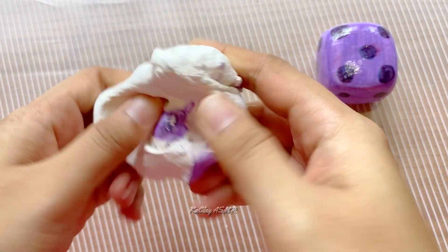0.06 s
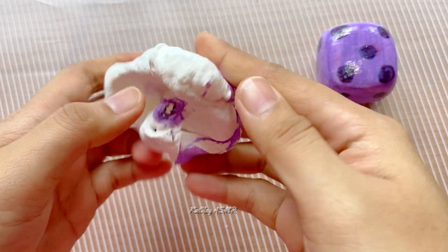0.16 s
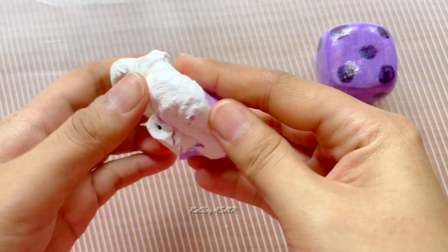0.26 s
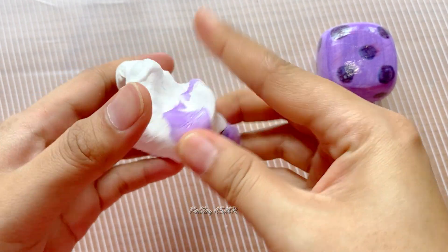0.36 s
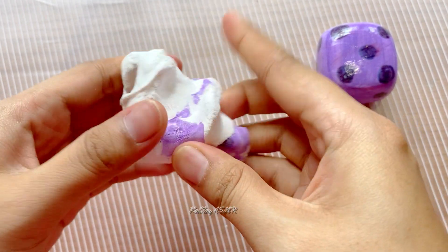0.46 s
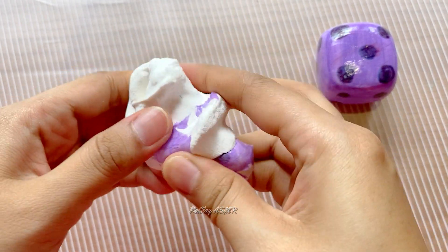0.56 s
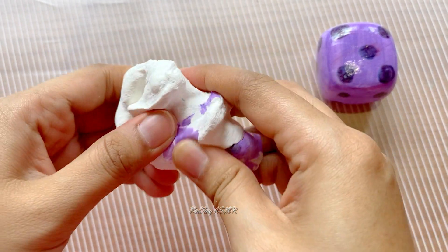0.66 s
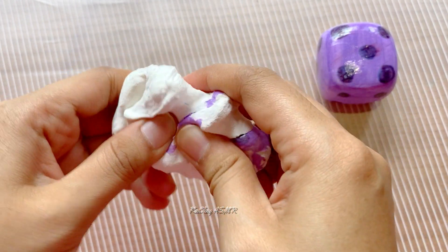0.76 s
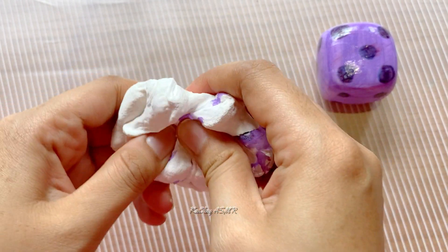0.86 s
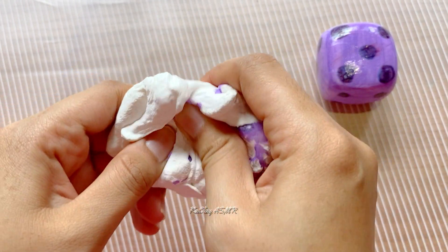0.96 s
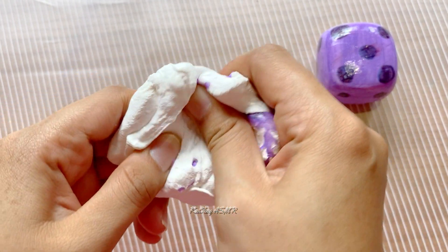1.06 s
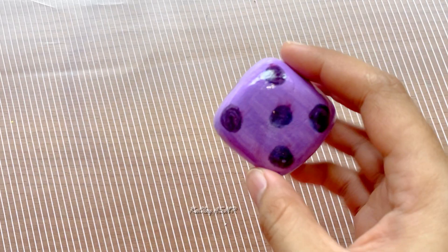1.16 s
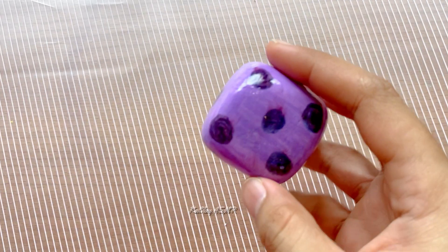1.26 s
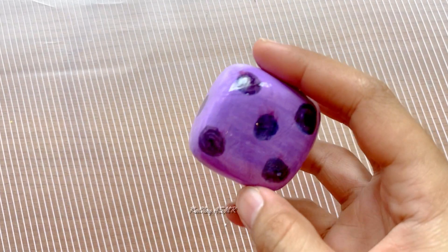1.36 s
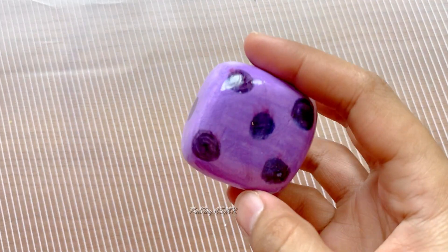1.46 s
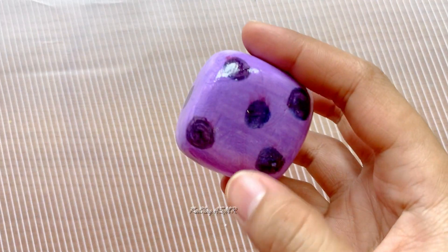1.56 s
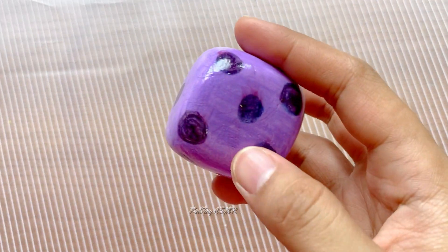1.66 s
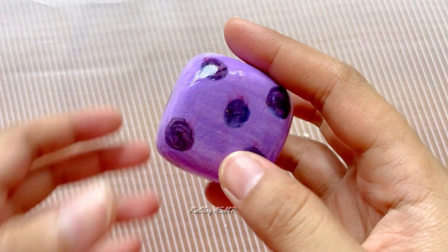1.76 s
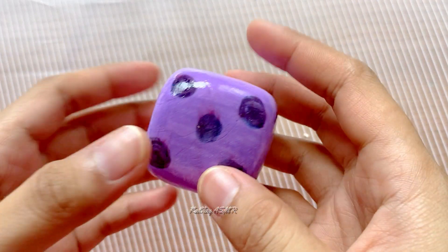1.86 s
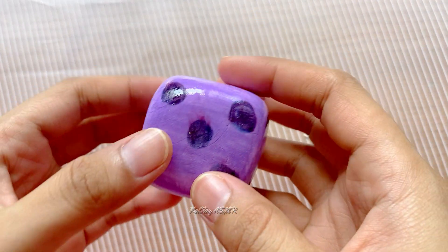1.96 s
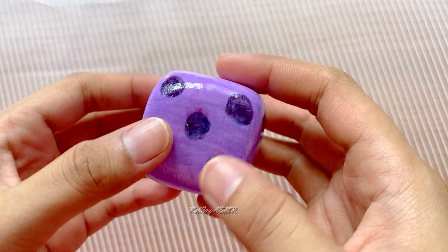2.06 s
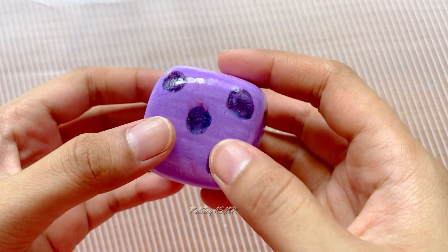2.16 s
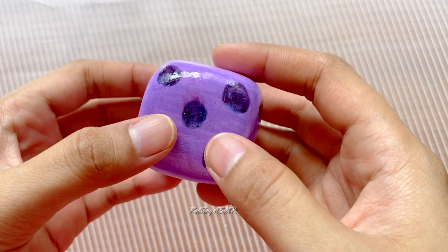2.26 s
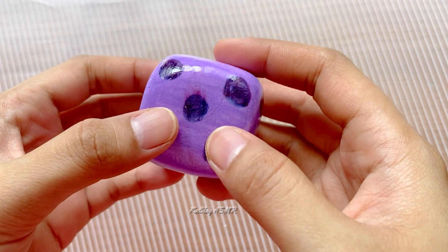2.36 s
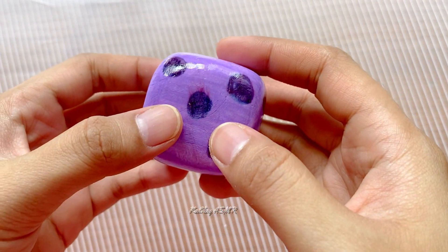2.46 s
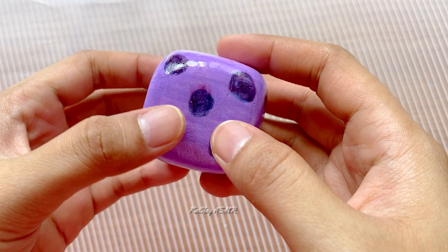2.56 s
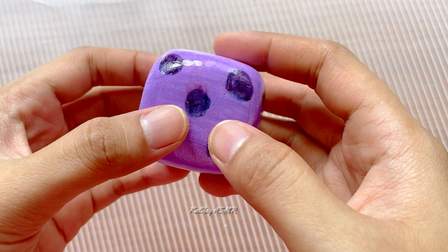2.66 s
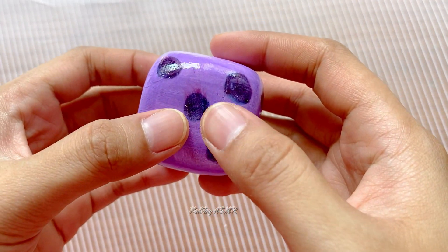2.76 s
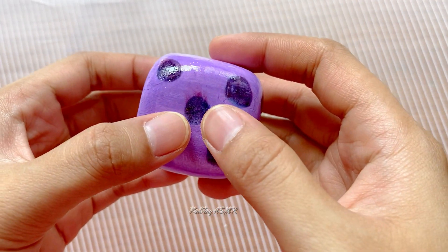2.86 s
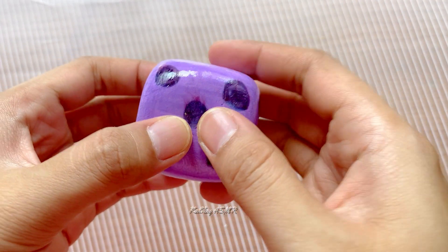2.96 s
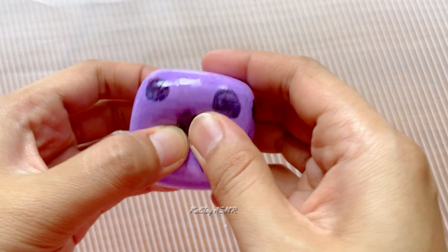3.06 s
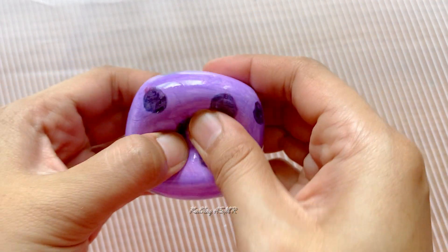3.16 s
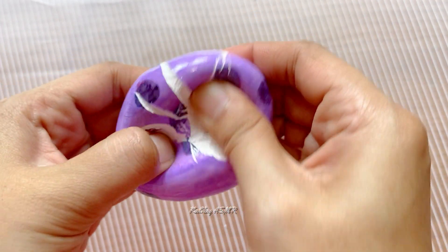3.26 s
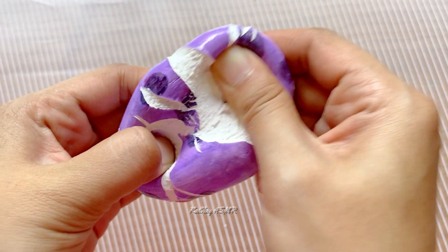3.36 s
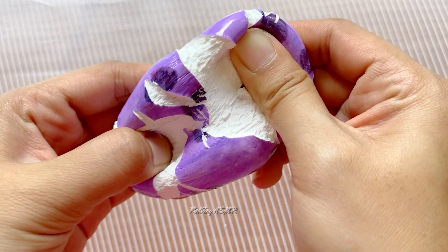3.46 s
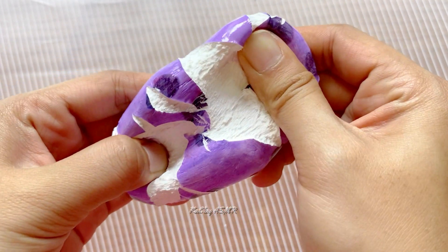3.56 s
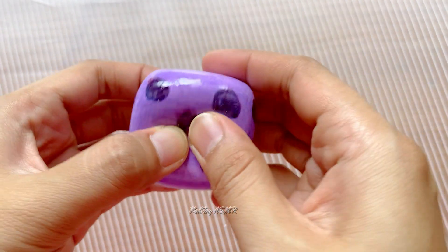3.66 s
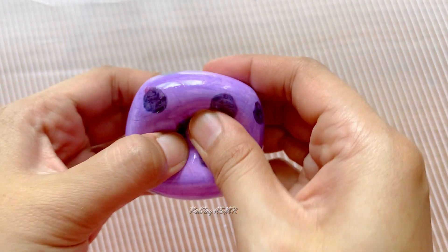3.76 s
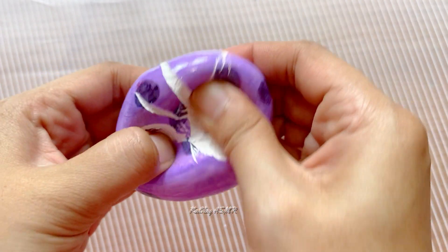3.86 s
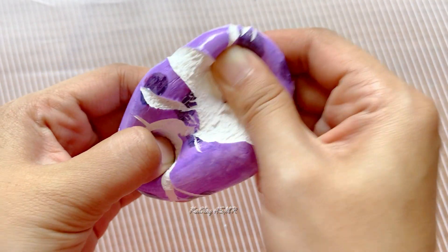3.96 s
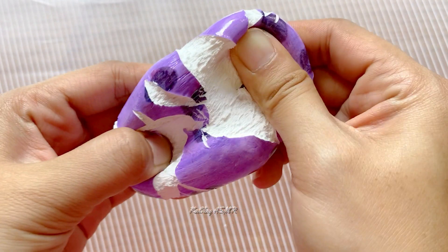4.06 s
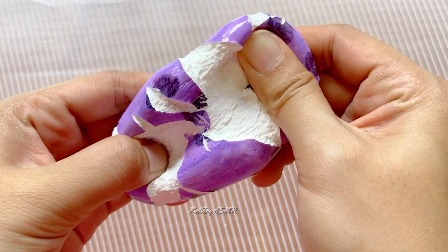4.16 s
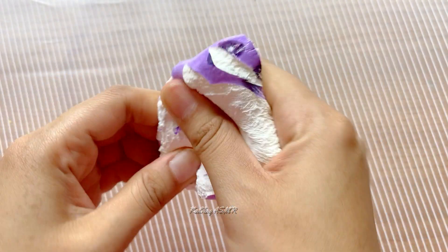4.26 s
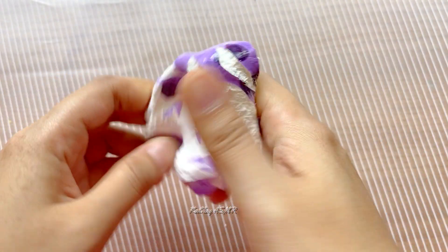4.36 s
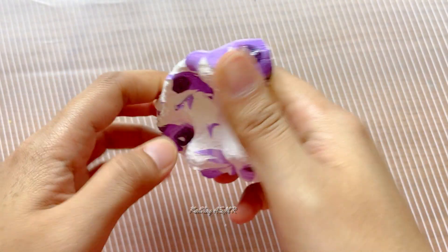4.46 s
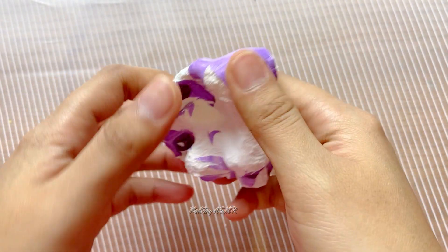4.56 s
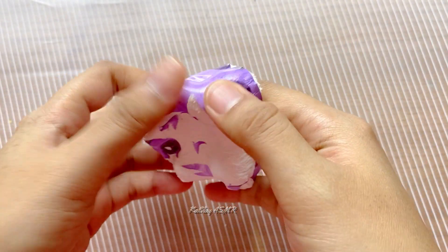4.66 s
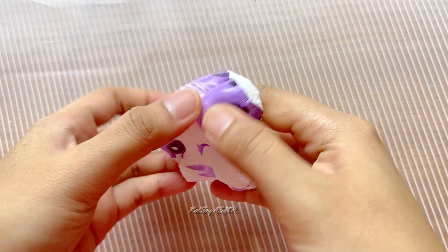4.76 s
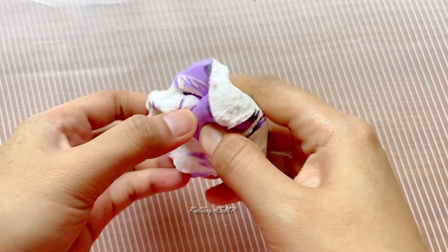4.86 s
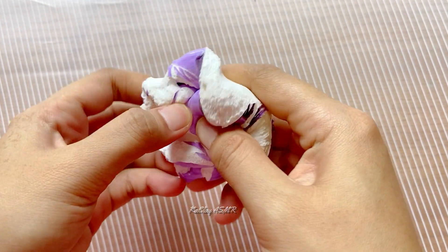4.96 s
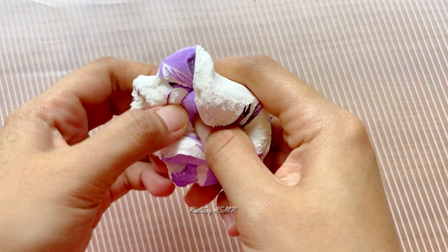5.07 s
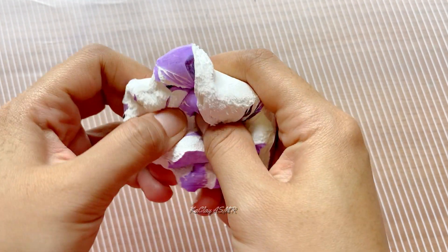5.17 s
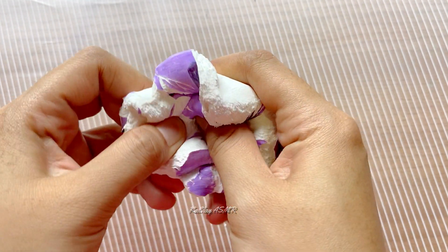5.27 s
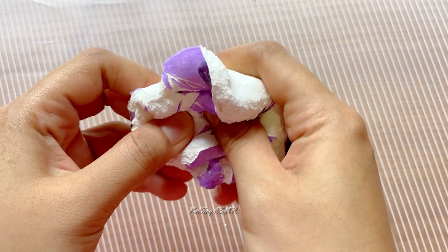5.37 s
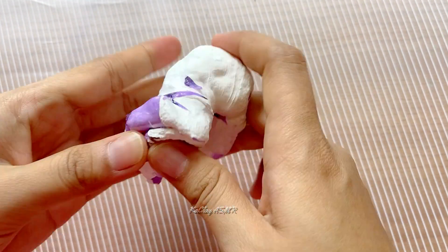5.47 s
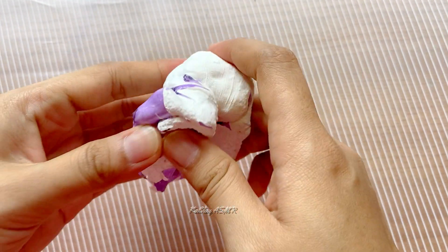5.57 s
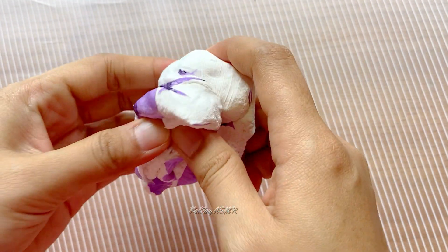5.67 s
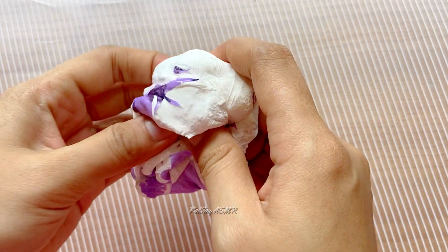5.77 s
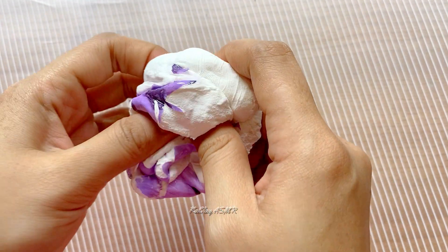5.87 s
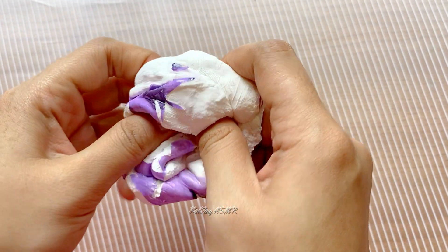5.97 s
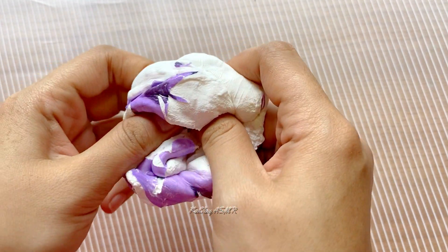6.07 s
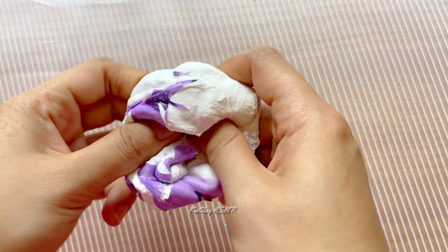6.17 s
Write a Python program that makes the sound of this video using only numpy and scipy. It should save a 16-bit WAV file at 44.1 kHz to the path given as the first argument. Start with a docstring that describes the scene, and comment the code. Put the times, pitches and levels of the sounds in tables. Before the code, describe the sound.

Fingers crush brittle-shelled soft clay up close: crackling crumble, an abrupt hush, then a sharp loud crunch heard twice and more crisp crackling bursts.

```python
"""In a quiet room, close by, fingers crush lumps of soft clay with a brittle dried shell.
Sharp cracks are noise bursts that ring in three bands; a dense crumble is chance grains through resonances.
Low thumps come from the soft core, and a short diffuse tail from the room; one squeeze is heard twice.
Below lie hiss, a low rumble, a hum and a thin whine, all shaped noise; the loudest cracks overload the input."""
import sys
import numpy as np
from scipy import signal
from scipy.fft import rfft, irfft
from scipy.io import wavfile

SR = 44100
rng = np.random.default_rng(int(sys.argv[2]) if len(sys.argv) > 2 else 0)


def field_ratio(decibels):
    """Amplitude ratio for a level in dB (20 dB per decade); scalars and array-likes work."""
    return 10 ** (np.asarray(decibels, dtype=float) / 20)


def int16_out(signal):
    """Quantize to a 16-bit WAV file."""
    q = np.round(np.clip(np.atleast_2d(signal).T, -1, 1) * 32767)
    wavfile.write(sys.argv[1], SR, q.astype(np.int16))


N = 274302
TIME = np.arange(N) / SR


def unit(x):
    """Normalisation: scales a signal to rms 1."""
    return x / np.sqrt(np.mean(x ** 2) + 1e-20)


def coloured(x, spectrum):
    """Linear filtering: weights the spectrum of x by (hz, gain_db) points, joined on a log frequency axis."""
    hz, db = np.transpose(spectrum)
    bins_hz = np.maximum(np.arange(len(x) // 2 + 1) * SR / len(x), 1)
    gain = field_ratio(np.interp(np.log(bins_hz), np.log(hz), db))
    return irfft(rfft(x) * gain, len(x))


def band(low_hz, high_hz):
    """Band limiting: sections of a Butterworth band-pass filter."""
    return signal.butter(3, [low_hz, min(high_hz, .45 * SR)], "band", fs=SR, output="sos")


def resonate(x, hz, width_hz):
    """Damped resonance: a pole pair whose radius sets the bandwidth, with gain 1 on top."""
    r = np.exp(-np.pi * width_hz / SR)
    zeros = [(1 - r * r) / 2, 0, (r * r - 1) / 2]
    poles = [1, -2 * r * np.cos(2 * np.pi * hz / SR), r * r]
    return signal.lfilter(zeros, poles, x)


def drift(rate_hz):
    """Slow random modulation: white noise through a two-pole low-pass, with spread 1."""
    r = np.exp(-2 * np.pi * rate_hz / SR)
    settled = signal.lfilter([1], [1, -2 * r, r * r], rng.standard_normal(N + SR))[SR:]
    return unit(settled)


def narrow_noise(hz, width_hz):
    """Narrow-band noise: two equal resonances in cascade give a wavering tone of rms 1."""
    once = resonate(rng.standard_normal(N), hz, width_hz)
    return unit(resonate(once, hz, width_hz))


def air_hiss():
    """Broadband noise: steady room air and hiss with a falling spectrum."""
    # spectrum of the air: hz, relative_db_per_hz
    air_spectrum = [(20, 4.5), (60, -0.5), (300, -7), (700, -9), (1200, -12), (10000, -17.5), (16000, -15)]
    return field_ratio(-61.5) * unit(coloured(rng.standard_normal(N), air_spectrum))


def low_rumble():
    """Amplitude modulation: narrow noise at 66 Hz swells and sinks in level."""
    # level of the rumble: time_s, level_db
    rumble_level = [(.55, -70.5), (.75, -53.5), (1.0, -66), (1.2, -51.5), (1.5, -62), (1.9, -71),
                    (2.198, -76.5), (6.22, -72.5)]
    s, db = np.transpose(rumble_level)
    return field_ratio(np.interp(TIME, s, db)) * narrow_noise(66.0, 23.0)


def motor_hum():
    """Harmonic series: a distant motor's hum, wavering lines on multiples of one pitch."""
    pitch_hz, width_hz = 58.54, 9.7
    # lines of the hum: multiple, level_db
    hum_lines = [(1, -63.5), (2, -75), (3, -70), (4, -71.5), (5, -79), (6, -78.5), (7, -81.5), (8, -78),
                 (9, -86)]
    return sum(field_ratio(db) * narrow_noise(k * pitch_hz, width_hz) for k, db in hum_lines)


def puffs():
    """Enveloped noise: bands of noise swell and die as faint passing noises and short rubs of the clay."""
    # puffs and rubs, rise and fall to 1/e of the peak: peak_s, rise_s, fall_s, centre_hz, width_hz, level_db
    puff_rows = [(.408, 0.0054, .01, 3240, 900, -48.5), (0.559, 0.0055, 0.0072, 3300, 600, -50),
                 (.578, 0.0049, 0.009, 3260, 500, -44.5), (1.44, 0.035, 0.047, 11770, 7120, -55.5),
                 (1.679, 0.021, 0.056, 1007, 150, -54.5), (1.75, 0.056, 0.077, 1038, 296, -61),
                 (4.664, .004, 0.0034, 3100, 900, -47), (4.681, .004, .004, 3050, 900, -41.5),
                 (5.661, 0.005, 0.0093, 3500, 1150, -32), (5.661, 0.0086, .012, 1940, 600, -41),
                 (5.69, 0.013, 0.023, 3600, 1000, -42)]
    out = np.zeros(N)
    for at, rise, fall, hz, width_hz, db in puff_rows:
        decay = np.where(TIME < at, ((at - TIME) / rise) ** 2, np.abs(TIME - at) / fall)
        out += field_ratio(db) * np.exp(-decay) * narrow_noise(hz, width_hz)
    return out


def background():
    """Superposition: the hiss, rumble, hum, puffs and a thin whine at 10686 Hz add up."""
    whine = field_ratio(-85) * narrow_noise(10686, 30.0)
    return air_hiss() + low_rumble() + motor_hum() + puffs() + whine


def room(x, dull=0.098):
    """Reverberation: convolution with exponentially dying noise gives a short diffuse tail."""
    t60_s, tail_db = .09, -17
    t = np.arange(round(.25 * SR)) / SR
    tail = rng.standard_normal(len(t)) * field_ratio(-60 * t / t60_s) * (t > .002)
    tail = signal.lfilter([1], [1, -dull], tail)
    tail = tail / np.sqrt(np.sum(tail ** 2))
    return field_ratio(tail_db) * signal.fftconvolve(x, tail)[:N]


def pressure():
    """Power summation: overlapping finger presses set the crumble's level (dB) and brightness (dB)."""
    shape = 1.165  # 1 = pointed swell, 2 = rounded
    # presses of the fingers, rise and fall span 20 dB: peak_s, peak_db, rise_s, fall_s, brightness_db
    presses = [(0.086, -29.5, 0.036, 0.11, -0.5), (0.146, -25, 0.082, 0.057, 1.5),
               (0.189, -39, 0.049, .03, 1), (.24, -47.5, .05, 0.073, -5.5), (.42, -52.5, 0.073, 0.033, -10),
               (.575, -57.5, 0.066, 0.048, 2.5), (.785, -32, 0.065, 0.026, -9.5), (.84, -44.5, .05, .06, 5),
               (.905, -36, 0.068, 0.077, 3.5), (.995, -33.5, 0.043, .08, 0.5),
               (1.07, -36.5, 0.22, 0.14, 4.5), (3.209, -50, 0.03, 0.051, 16.5),
               (3.268, -27.5, .006, .04, -2), (3.286, -15, .01, 0.13, 0), (3.345, -19.5, .05, .14, -5.5),
               (3.48, -40, 0.096, 0.12, -5.5), (4.28, -48.5, 0.14, 0.13, 16), (4.376, -27.5, 0.1, 0.12, 6),
               (4.48, -36, .1, 0.089, -3), (4.55, -41, .04, 0.018, 0.5), (4.679, -57, 0.29, 0.047, -2),
               (4.85, -57, 0.27, 0.22, 1.5), (5.031, -46, 0.078, 0.2, 1.5),
               (5.059, -37.5, 0.023, .04, -5.5), (5.16, -25.5, 0.024, .12, -4), (5.26, -38, 0.052, .1, 3),
               (5.391, -43, 0.032, .06, 13.5), (5.486, -28.5, 0.076, 0.016, 0.5),
               (5.57, -51.5, 0.049, 0.071, 0), (5.67, -43.5, 0.091, 0.065, -0.5),
               (5.77, -40, 0.096, 0.14, 6), (5.855, -27, 0.097, 0.14, -4), (6.035, -29.5, 0.14, 0.13, -1.5),
               (6.2, -46.5, 0.156, .1, 0)]
    s, db, rise, fall, bright_db = np.transpose(presses)[:, :, None]
    t = TIME[::32]
    away = np.where(t < s, (s - t) / rise, (t - s) / fall)
    power = field_ratio(np.maximum(db - 20 * away ** shape, -150)) ** 2
    total = power.sum(axis=0)
    level_db = 10 * np.log10(total)
    mean_bright_db = (power * bright_db).sum(axis=0) / total
    return np.interp(TIME, t, level_db), np.interp(TIME, t, mean_bright_db)


def crumble(level_db, bright_db, cycles=2.3, knee_hz=5000.0):
    """Shot noise: dense small fractures of uneven size come in clumps and each briefly rings a resonance."""
    per_s, spread_db, clump_db = 7000, 3.9, 2.5
    # relative spectrum of the shards: hz, relative_db_per_hz
    shard_spectrum = [(250, -36), (700, -14.5), (1500, -3.5), (2250, -11.5), (3240, -4), (5600, -3),
                      (10200, -1.5), (13500, 1), (16000, -12.5)]
    sizes = field_ratio(spread_db * np.minimum(rng.exponential(1, N), 4)) * rng.choice([-1, 1], N)
    grains = sizes * (rng.random(N) < per_s / SR)
    dealt = rng.integers(0, 8, N)  # which of the eight pitches each grain rings
    rings = np.zeros(N)
    for k, hz in enumerate(np.geomspace(600, 14000, 8)):
        own_grains = grains * (dealt == k) + 1e-18
        rings += unit(resonate(own_grains, hz, hz / cycles)) * np.sqrt(hz)
    rings = unit(coloured(rings, shard_spectrum))
    # brightness raises the part above the knee and lowers the part below it
    dull = signal.sosfilt(signal.butter(2, knee_hz, fs=SR, output="sos"), rings)
    tilt = field_ratio(bright_db / 2)
    tilted = dull / tilt + (rings - dull) * tilt
    return field_ratio(level_db + clump_db * drift(40)) * tilted


def chips(level_db):
    """Random point process: small cracks at chance moments, sized by the pressure, each of its own colour."""
    per_s, base_db, size_spread_db, colour_spread_db = 110, -11, 4, 7
    draw = rng.random((round(per_s * N / SR), 2))
    pressed_db = level_db[(draw[:, 0] * N).astype(int)]
    size_db = pressed_db + base_db - size_spread_db * np.log(np.maximum(draw[:, 1], .02))
    colour_db = colour_spread_db * np.clip(rng.standard_normal((len(draw), 3)), -3, .5)
    return np.column_stack([draw[:, 0] * N / SR, size_db[:, None] + colour_db])


def start_level(x):
    """Onset normalisation: scales x to rms 1 over its first 2 ms."""
    return x / np.sqrt(np.mean(x[:SR // 500] ** 2))


def cracks(rows, thumps, thump_hz=500.0, thump_damping=26.0, knock_db=5.0):
    """Brittle fracture: a sharp front and a ragged, dying burst of noise excite brief shard resonances."""
    ragged_db, front, ring_db, cycles = 4, 4, 2, 5
    # decay at a level of -20 dB, its growth (octaves per 10 dB) and its chance spread (octaves)
    usual_t60_s, loud_longer, t60_spread = 0.0067, 0.096, 0.43
    # each crack nudges the core: thump level at a body level of -30 dB, and its slope (dB per dB)
    nudge_db, nudge_follows = -57, 0.41
    # where the shards ring: low_hz, high_hz, ring_hz, ring_spread_octaves
    shell_bands = [(1800, 4000, 2300, .15), (4000, 8500, 5000, .3), (8500, 16000, 12500, .2)]
    size = 1024
    out = np.zeros(N + size)
    t = np.arange(size) / SR
    filters = [band(low, high) for low, high, hz, octaves in shell_bands]
    count = len(rows) + len(thumps)
    breaks = rng.standard_normal((count, size))
    ragged = rng.standard_normal((count, size // 16))
    chance = rng.standard_normal((count, 4))
    # the soft core gives way under the shell: one low push, and the burst heard dully through the clay
    push = np.sin(2 * np.pi * thump_hz * t) * np.exp(-t * thump_hz * thump_damping)
    push = start_level(signal.sosfilt(band(60, 1400), push))
    core = band(750, 1800)
    for k, (s, *levels_db) in enumerate([*rows, *thumps]):
        if max(levels_db) < -75:
            continue
        octaves_longer = loud_longer * (max(levels_db) + 20) / 10 + t60_spread * chance[k, 3]
        t60 = max(usual_t60_s * 2 ** octaves_longer, .002)
        burst = breaks[k] * field_ratio(-60 * t / t60 + ragged_db * np.repeat(ragged[k], 16))
        burst[0] = front * np.sign(burst[0])
        is_shell = k < len(rows)
        thump_db = nudge_db + nudge_follows * (levels_db[0] + 30) if is_shell else levels_db[0]
        knock = field_ratio(knock_db) * start_level(signal.sosfilt(core, burst))
        crack = field_ratio(thump_db) * (push + knock)
        shell_levels_db = levels_db if is_shell else []
        for sos, (low, high, hz, octaves), db, p in zip(filters, shell_bands, shell_levels_db, chance[k]):
            hz = np.clip(hz * 2 ** (octaves * p), low, high)
            ring = field_ratio(ring_db) * np.sqrt(cycles) * resonate(burst, hz, hz / cycles)
            crack = crack + field_ratio(db) * start_level(signal.sosfilt(sos, burst + ring))
        at = round(s * SR)
        out[at:at + size] += crack
    return out[:N]


def scene():
    """Superposition: clay and its room tail, cut off after the first lump, over the background."""
    cut_s, cut_fade_s = 1.136, .005
    replay_from_s, replay_at_s, replay_s = 3.05, 3.64946, .55
    # clear cracks of the shell, rms over the first 2 ms in three bands (1.8-4, 4-8.5, 8.5-16 kHz):
    # start_s, body_db, edge_db, snap_db
    clear_cracks = [(0.0332, -41, -58, -36.5), (0.0506, -34.5, -56, -24), (0.0835, -27.5, -32.5, -19.5),
                    (0.1066, -23.5, -26.5, -26), (0.1239, -27, -29, -26), (0.1444, -29, -16.5, -20.5),
                    (0.1496, -16.5, -20, -21.5), (0.1937, -25.5, -25.5, -33.5), (0.2136, -45, -49, -44),
                    (0.2588, -49, -53, -51.5), (0.3229, -65, -61, -51), (0.3404, -70, -58, -47.5),
                    (0.424, -45.5, -38, -38.5), (0.4414, -44, -27, -27.5), (0.5756, -49, -49, -50),
                    (0.5912, -60, -55, -47), (0.7107, -35, -34.5, -35.5), (0.7282, -26, -28, -25),
                    (0.7371, -33, -35, -37.5), (0.7475, -47, -37, -36), (0.7556, -47, -39, -33.5),
                    (0.7649, -27.5, -30, -17), (0.7729, -37, -20, -19), (0.7811, -45, -34, -22),
                    (0.7868, -41, -22.5, -16.5), (0.7952, -26, -20.5, -17.5), (0.7989, -37, -26, -24.5),
                    (0.8286, -51, -36.5, -28), (0.8461, -45, -35.5, -29.5), (0.8693, -41.5, -25.5, -28),
                    (0.8873, -31.5, -18, -19), (0.8891, -22.5, -19, -23), (0.8996, -28, -20, -18.5),
                    (0.9096, -23.5, -17.5, -20), (0.9302, -36, -28, -32), (0.9364, -43, -22.5, -28),
                    (0.9481, -34.5, -28.5, -28), (0.9726, -32, -27, -31.5), (0.99, -27, -20.5, -14.5),
                    (1.0003, -27.5, -21, -19.5), (1.0303, -27.5, -17, -21.5), (1.0389, -35, -27, -23),
                    (1.0605, -32, -27, -30.5), (1.0651, -31, -20.5, -21), (1.07, -41, -19, -25),
                    (1.0875, -22.5, -18.5, -22), (1.1039, -33, -18.5, -23.5), (1.1269, -16.5, -16, -16.5),
                    (3.0161, -52, -52, -41.5), (3.177, -46.5, -40, -38), (3.1868, -46.5, -32, -33),
                    (3.1918, -44, -33.5, -32.5), (3.1944, -41.5, -30, -30.5), (3.2042, -39, -20.5, -23),
                    (3.2092, -30, -19, -14.5), (3.2634, -17.5, -12.5, -7.5), (3.2648, -7, -14, -9.5),
                    (3.2806, -10.5, -5, -11.5), (3.2822, -9.5, -15, -3), (3.2946, -18.5, -14.5, -6),
                    (3.3038, -17, -18.5, -20), (3.3134, -31, -19, -9.5), (3.3157, -14, -18.5, -15.5),
                    (3.3196, -14, -13, -12.5), (3.3271, -16, -13, -10.5), (3.3371, -11.5, -13.5, -10.5),
                    (3.3444, -7.5, -3, -8), (3.3462, -13, -15.5, -7.5), (3.3592, -15, -10, -8.5),
                    (3.3663, -16, -14, -2.5), (3.3742, -23, -24, -24), (3.3849, -19, -15, -20),
                    (3.4235, -30, -30.5, -26.5), (3.441, -16.5, -17, -11), (3.4865, -29, -26.5, -22),
                    (3.5135, -58.5, -29, -19.5), (4.2485, -58, -39, -46.5), (4.2659, -41, -29.5, -29),
                    (4.2766, -38, -36, -30.5), (4.2813, -44, -32, -21.5), (4.3127, -38, -28.5, -39.5),
                    (4.3626, -30.5, -58, -20), (4.3798, -23.5, -16.5, -0.5), (4.3869, -18, -16.5, -9),
                    (4.4237, -16, -20, -17.5), (4.4787, -35, -27.5, -26.5), (4.4885, -47, -29, -20),
                    (4.5515, -27.5, -28, -23.5), (4.6644, -55, -53, -57), (4.6818, -45, -54, -46),
                    (4.9907, -62, -54, -28.5), (5.0115, -66, -40, -31.5), (5.0289, -62, -28.5, -20.5),
                    (5.0784, -27.5, -35.5, -29), (5.1128, -24, -25, -30), (5.1209, -36, -34, -25),
                    (5.1383, -19.5, -14.5, -9), (5.1578, -18.5, -19, -13), (5.1628, -19, -13.5, -19.5),
                    (5.1825, -23.5, -17.5, -12), (5.1876, -18, -19.5, -18.5), (5.2099, -25.5, -18, -28.5),
                    (5.2205, -48, -24, -22.5), (5.2379, -28.5, -11, -5), (5.291, -27, -17.5, -16),
                    (5.3349, -37, -28, -26.5), (5.3804, -38.5, -22, -22.5), (5.3829, -45, -39.5, -22),
                    (5.4002, -31.5, -20, -6.5), (5.4624, -18.5, -19.5, -21), (5.4758, -20.5, -8, -10),
                    (5.479, -11, -11, -14), (5.5068, -49, -39, -24.5), (5.571, -29.5, -39, -45.5),
                    (5.6587, -45.5, -41, -36), (5.7213, -31, -29, -20), (5.7355, -40, -33.5, -25),
                    (5.7529, -21.5, -22.5, -11.5), (5.7693, -27, -19, -19.5), (5.7842, -36, -30, -19.5),
                    (5.7952, -35, -20.5, -27), (5.8085, -22, -29, -16.5), (5.8147, -54, -30.5, -24),
                    (5.8261, -27, -17, -16), (5.8434, -10.5, -16, -14), (5.8539, -32, -15.5, -22.5),
                    (5.8684, -39, -22.5, -24), (5.9039, -23, -19.5, -24.5), (5.909, -40, -29.5, -14.5),
                    (5.9264, -32, -20, -12.5), (5.9277, -37, -24.5, -15), (5.9549, -23, -23.5, -25.5),
                    (5.9672, -33, -21.5, -30.5), (5.9787, -31, -21, -27), (5.9846, -17, -14.5, -14.5),
                    (5.9901, -27, -14.5, -26), (5.9996, -22, -19, -20.5), (6.0128, -13.5, -20, -23),
                    (6.0302, -6.5, -5.5, -13.5), (6.0318, -16, -17.5, -6), (6.0467, -26.5, -17, -25.5),
                    (6.0709, -44, -22, -31), (6.0853, -20, -18, -30), (6.1381, -44, -46, -23.5),
                    (6.1576, -35, -27, -39.5), (6.1963, -55, -35, -35), (6.2137, -33.5, -20.5, -24.5)]
    # deep cracks where the core gives way with a low thump: start_s, level_db
    deep_thumps = [(.1239, -48), (0.1441, -43), (3.2624, -26.5), (3.2808, -19), (3.3218, -29),
                   (3.3271, -26.5), (3.3382, -27), (3.3445, -18.5), (3.3666, -46), (3.3852, -30),
                   (3.442, -41.5), (4.3778, -43.5), (4.3873, -36.5), (4.4221, -35.5), (5.1364, -35.5),
                   (5.164, -49), (5.1871, -40.5), (5.3987, -36), (5.4626, -40.5), (5.48, -26), (5.843, -37),
                   (5.9828, -34.5), (6.0293, -35)]
    level_db, bright_db = pressure()
    clay = cracks(clear_cracks, deep_thumps) + cracks(chips(level_db), []) + crumble(level_db, bright_db)
    clay = clay + room(clay)
    clay *= np.where(TIME < 2, np.clip((cut_s - TIME) / cut_fade_s, 0, 1), 1)
    out = clay + background()
    # the first big squeeze is heard a second time, background included
    start, again, length = (round(s * SR) for s in (replay_from_s, replay_at_s, replay_s))
    out[again:again + length] = out[start:start + length]
    return out[None]


def roll_off(x):
    """The treble ends steeply here."""
    return signal.sosfilt(signal.butter(12, 16160, fs=SR, output="sos"), x)


def record(dry):
    """Hard clipping: the input overloads at full scale."""
    mix = np.clip(dry, -1, 1)
    return roll_off(mix)


dry = scene()
out = record(dry)
int16_out(out)
```